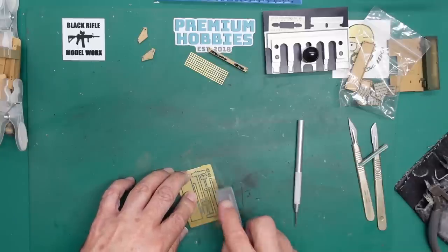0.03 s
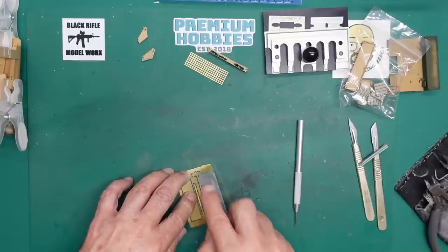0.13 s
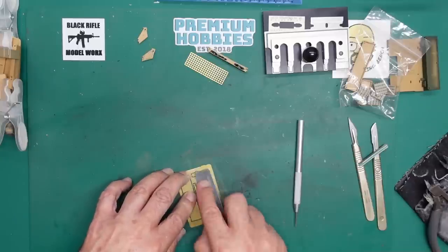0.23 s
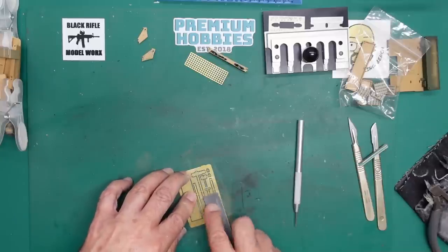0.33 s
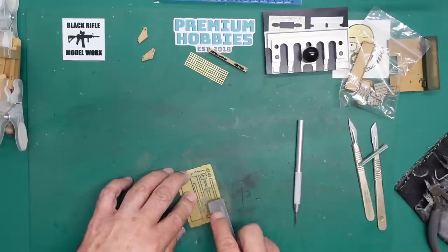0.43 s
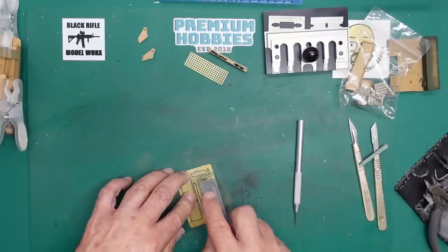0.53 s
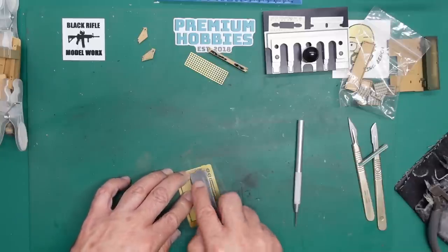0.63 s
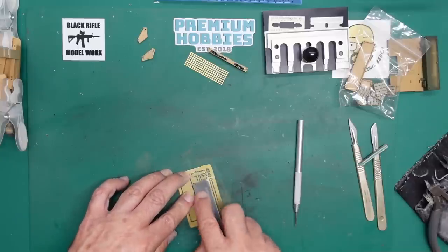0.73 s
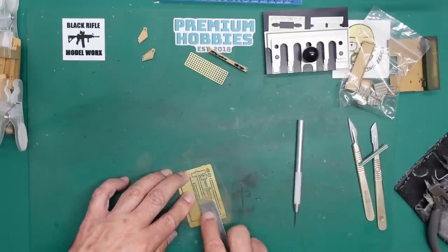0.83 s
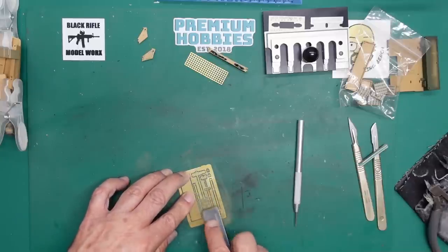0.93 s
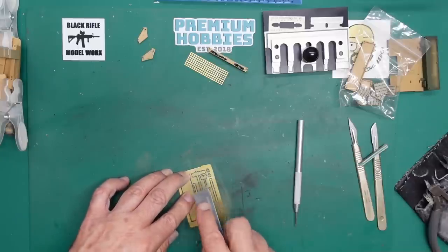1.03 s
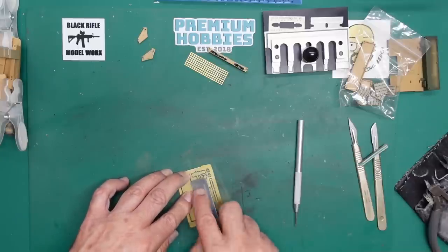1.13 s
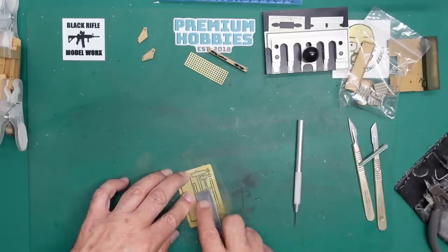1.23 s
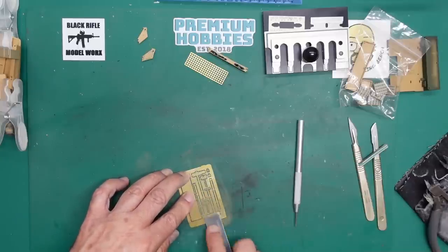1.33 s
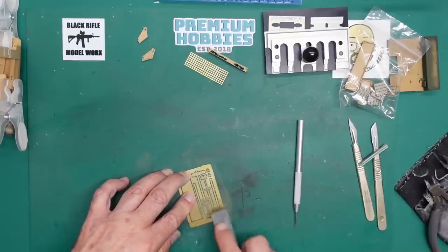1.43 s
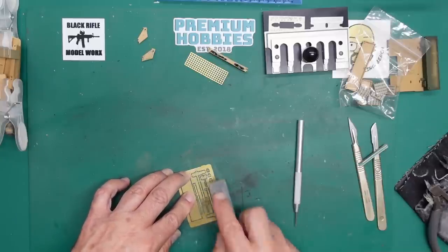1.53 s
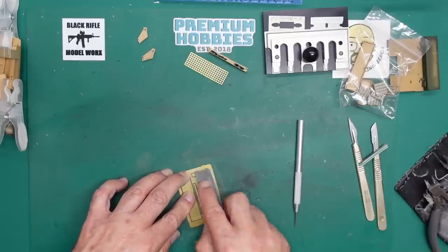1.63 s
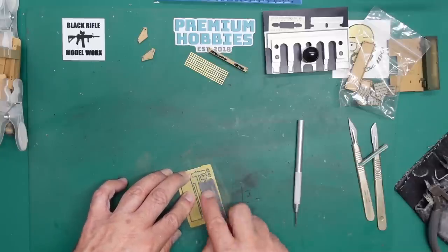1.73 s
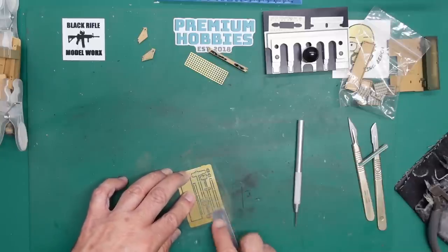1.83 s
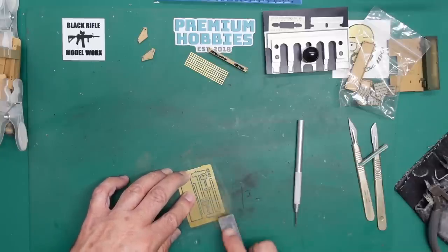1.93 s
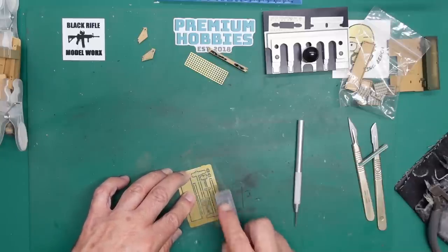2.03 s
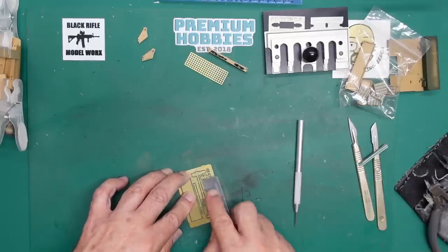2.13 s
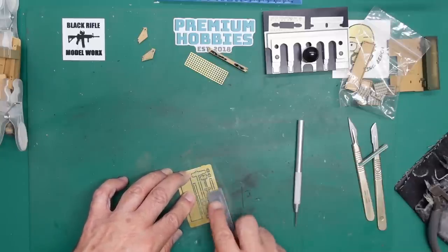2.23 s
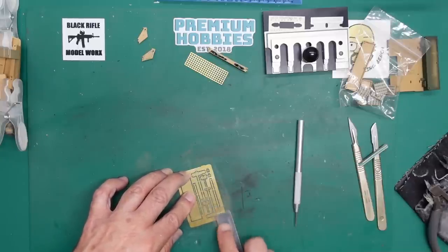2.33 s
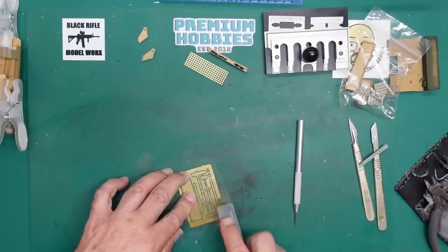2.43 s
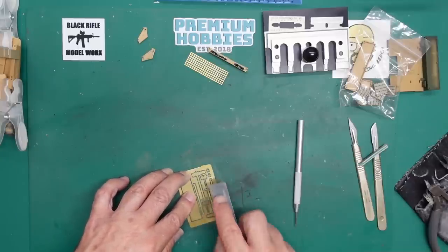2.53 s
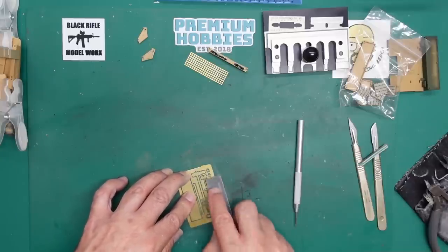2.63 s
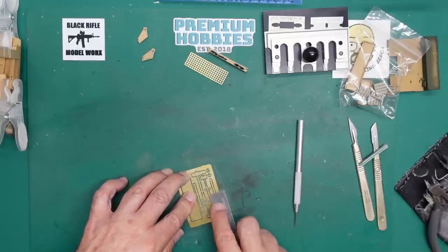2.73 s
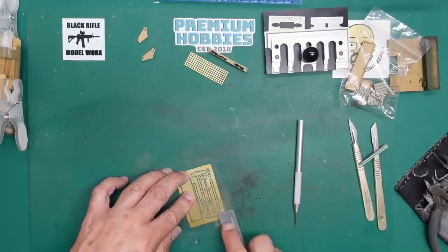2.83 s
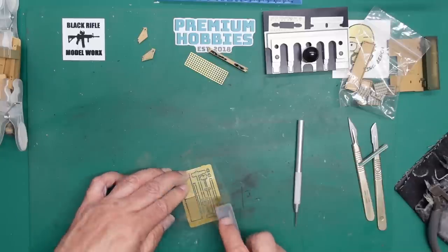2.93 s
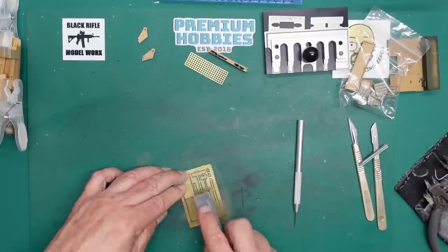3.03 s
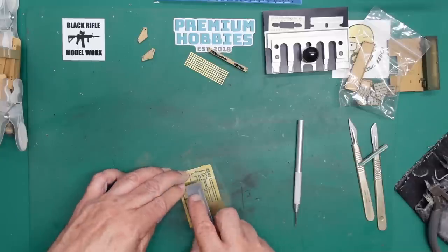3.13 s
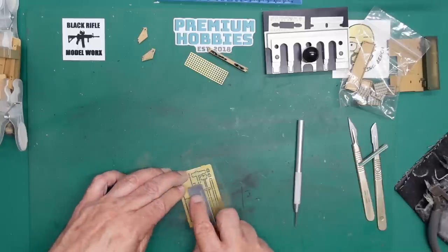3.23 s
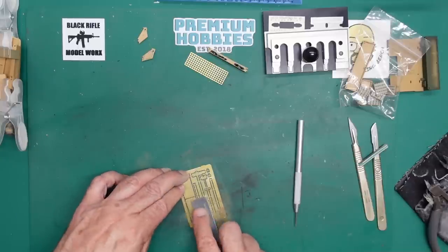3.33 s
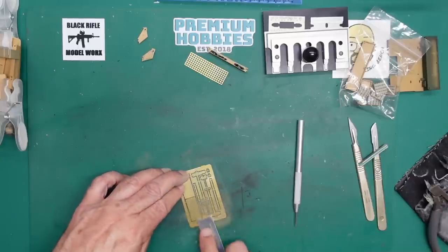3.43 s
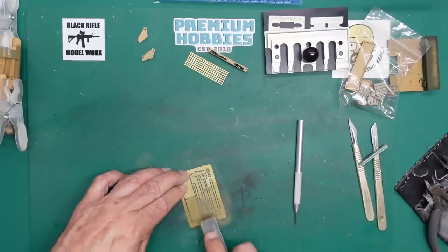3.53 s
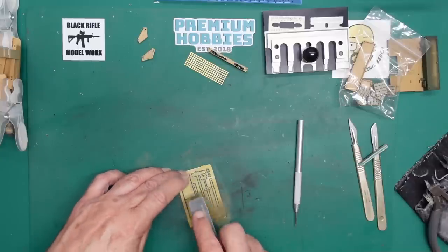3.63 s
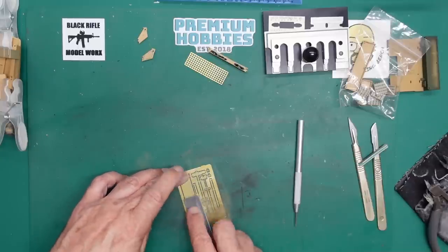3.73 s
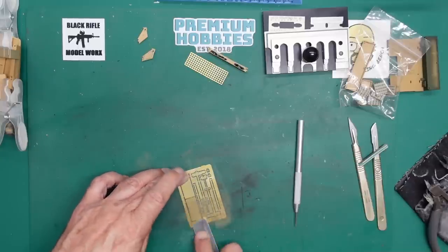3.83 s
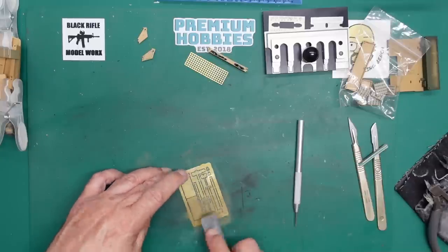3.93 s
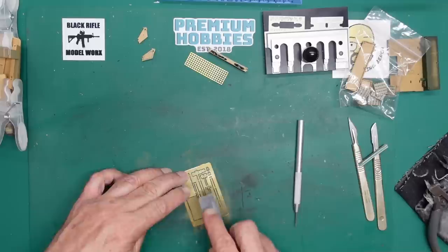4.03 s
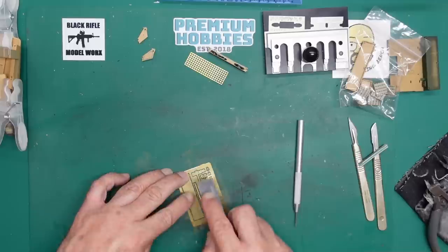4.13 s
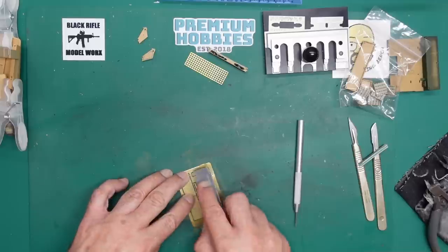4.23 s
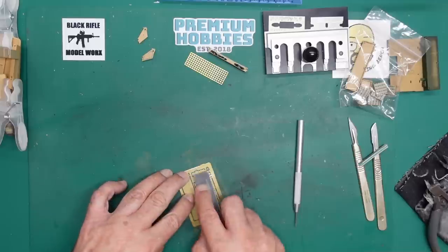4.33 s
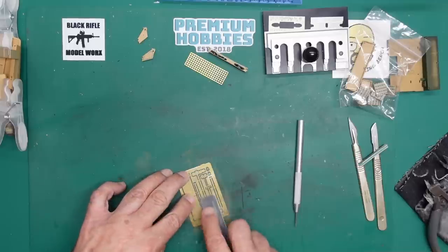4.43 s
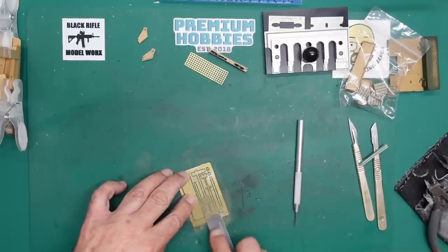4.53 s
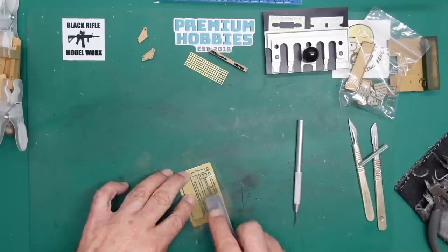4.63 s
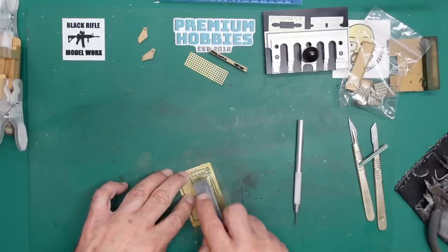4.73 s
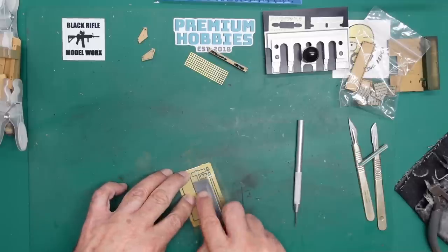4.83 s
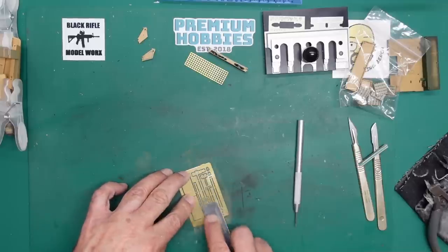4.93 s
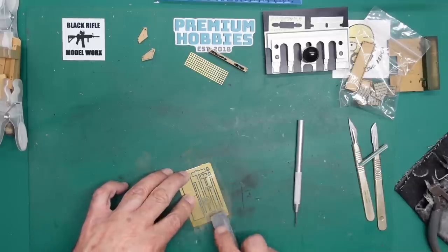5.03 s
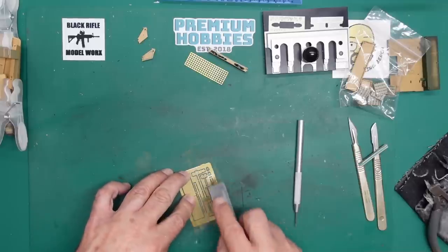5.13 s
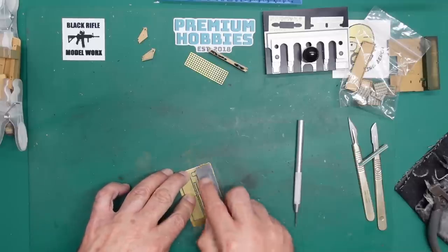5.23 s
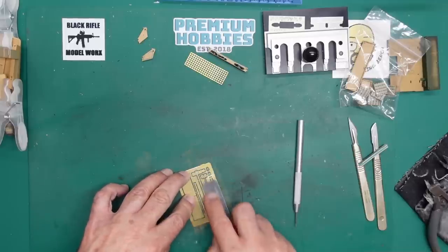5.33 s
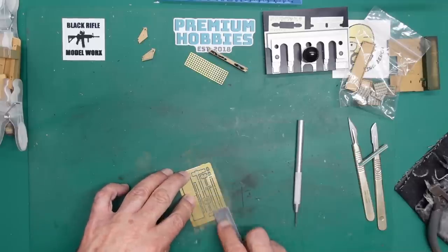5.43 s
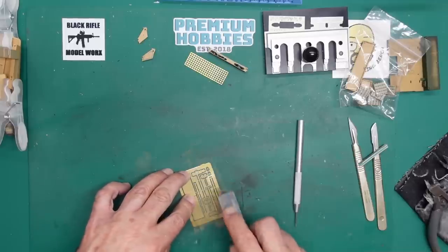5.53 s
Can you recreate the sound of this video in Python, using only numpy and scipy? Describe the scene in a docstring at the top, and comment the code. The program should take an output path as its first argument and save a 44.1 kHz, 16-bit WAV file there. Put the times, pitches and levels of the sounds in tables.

```python
"""Steady room noise with a faint fuzzy hum, and a fainter fuzzy tone that comes and goes, lie under everything.
From 0.2 s a sanding stick is set down on a thin brass sheet on a desk mat: noise-burst ticks excite the
sheet's modes, damped sines knock in the stick, and low pushes with rumble thump the desk.
It then bites, is pushed and lifts: dense random grit impulses drive the same modes as a shaped scratch.
This happens eleven times, up to 5.5 s, in a small damped room heard by a close pair of microphones."""
import sys
import numpy as np
from scipy import signal
from scipy.fft import rfft, irfft
from scipy.io import wavfile
from scipy.ndimage import uniform_filter1d

SR = 44100
rng = np.random.default_rng(int(sys.argv[2]) if len(sys.argv) > 2 else 0)


def digitize_waveform(pressure):
    """Quantize a signal to 16-bit integers and store it at the path in sys.argv[1].

    Rows of a 2-D input are taken as channels; values are limited to [-1, 1].
    """
    field = np.atleast_2d(pressure).T
    bounded = np.clip(field, -1, 1)
    quanta = np.round(bounded * 32767).astype(np.int16)
    wavfile.write(sys.argv[1], SR, quanta)


N = 246959

# colour of grit on brass between the modes, relative: f/Hz, density level/dB
GRIT_COLOUR = [(700, -9), (1200, -10.5), (1650, -5), (2100, -6.5), (2450, -3.5), (2900, -4), (3900, -5.5),
               (5000, -1), (5700, 3.5), (6600, 4.5), (7700, 5), (8700, 3.5), (11000, 2.5), (13500, 2.5),
               (15800, -0.5)]


def gain_of(db):
    """Level: an amplitude ratio is ten to the power of dB over 20."""
    return 10 ** (np.asarray(db) / 20)


def evened(x):
    """Normalisation: scales a signal to a root-mean-square value of 1."""
    return x / np.sqrt(np.mean(x ** 2) + 1e-20)


def read(points, hz):
    """Interpolation: reads a table of values along a logarithmic frequency axis."""
    f, value = np.transpose(points)
    return np.interp(np.log(hz + 1), np.log(f + 1), value)


def add(mix, s, sound):
    """Superposition: adds a sound to the mix from time s."""
    part = mix[round(s * SR):][:len(sound)]
    part += sound[:len(part)]


def resonate(x, hz, width):
    """Resonance: a damped two-pole oscillator with a peak gain near 1."""
    r = np.exp(-np.pi * max(width, 5) / SR)
    return signal.lfilter([1 - r, 0, r - 1], [1, -2 * r * np.cos(2 * np.pi * hz / SR), r * r], x)


def coloured(x, db_of):
    """Linear filtering: weights the spectrum by a level in dB given as a function of frequency."""
    hz = np.fft.rfftfreq(len(x), 1 / SR)
    return irfft(rfft(x) * gain_of(db_of(hz)), len(x))


def wander(rate_hz, count):
    """Slow random variation: straight lines join normal random values drawn rate_hz times a second."""
    knot_t = np.arange(int(N / SR * rate_hz) + 2) / rate_hz
    t = np.arange(N) / SR
    return [np.interp(t, knot_t, row) for row in rng.standard_normal((count, len(knot_t)))]


def air():
    """Partial coherence: steady noise is partly shared by the two channels; resonant noise hums in both."""
    # spectrum of room air and microphone hiss, relative: f/Hz, density level/dB
    air_colour = [(25, -42), (60, -15), (100, -19), (145, -5), (247, -2), (500, -7.5), (900, -11),
                  (1350, -13.5), (1800, -10.5), (2190, -14), (3200, -18), (5640, -20.5), (15800, -26.5)]
    # left-right likeness of the hiss: f/Hz, correlation (0 to 1)
    likeness = [(30, .9), (60, 0.24), (250, 0.49), (1000, 0.7), (4000, 0.6), (15000, 0.83)]
    # fuzzy low hum: f/Hz, width of each of two resonances/Hz, level/dB
    hum_mode = (121, 32, -77)
    level_db = -66

    a, b = rfft(rng.standard_normal((2, N)), axis=1)
    hz = np.fft.rfftfreq(N, 1 / SR)
    same = np.clip(read(likeness, hz), 0, 1)
    pair = np.array([a, same * a + np.sqrt(1 - same ** 2) * b])
    hiss = irfft(pair * gain_of(read(air_colour, hz)), N, axis=1)
    hum_hz, width, hum_db = hum_mode
    hum = resonate(resonate(rng.standard_normal(N), hum_hz, width), hum_hz, width)
    return gain_of(level_db) * evened(hiss) + gain_of(hum_db) * evened(hum)


def whine():
    """Narrow-band noise: two equal resonances in series make a fuzzy tone, unrelated left and right."""
    # spells of the tone: start t/s, end t/s, level/dB
    spells = [(2.42, 2.95, -83), (4.05, 4.12, -86)]
    rest_db, fade_s = -94, 0.15
    tone_hz, width_hz, waver_db = 1870, 90, 3

    t = np.arange(N) / SR
    db = rest_db
    for start, end, top_db in spells:
        inside = np.clip(1 + np.minimum(t - start, end - t) / fade_s, 0, 1)
        db = db + (top_db - rest_db) * inside
    tone = rng.standard_normal((2, N))
    tone = resonate(resonate(tone, tone_hz, width_hz), tone_hz, width_hz)
    return gain_of(db + waver_db * wander(10.1, count=1)[0]) * evened(tone)


def room(x):
    """Reverberation: sparse taps of random sign, unlike left and right, decay at a rate set by frequency."""
    # reverberation time: f/Hz, t60/s
    decay = [(100, 0.94), (2000, 1), (15000, 0.44)]
    taps = np.zeros((2, SR // 2))
    at = np.arange(100, SR // 2 - 20, 20)
    at = at + rng.integers(0, 20, (2, len(at)))  # one tap at random in each slot of 20 samples
    np.put_along_axis(taps, at, rng.choice([-1., 1.], at.shape), 1)
    hz, t, z = signal.stft(taps, SR, nperseg=256)
    fall = gain_of(-60 * t / read(decay, hz)[:, None])
    tail = signal.istft(z * fall, SR, nperseg=256)[1]
    return signal.fftconvolve(x[None], tail / np.linalg.norm(tail[0]), axes=1)[:, :N]


def thumps(rise_s=0.012, rumble_db=-4, sag_db=-14):
    """Forced vibration: the hand's weight gives a low push, rumble and sag, which ring the desk top."""
    # the desk takes the hand's weight: t/s, push level/dB, f of the push/Hz, t60/s
    weights = [(0.242, -54.5, 124, 0.13), (0.698, -58.5, 116, 0.096), (1.184, -60, 120, 0.075),
               (1.683, -59, 152, 0.24), (2.201, -51, 144, .12), (2.671, -57, 133, 0.13),
               (3.213, -50.5, 135, 0.26), (3.734, -50.5, 140.7, 0.24), (3.82, -61, 128, .2),
               (3.97, -61, 111, 0.11), (4.33, -71, 94, 0.11), (4.808, -63, 105, 0.099),
               (5.289, -46.5, 141.4, 0.18)]
    # lowest mode of the desk top: f/Hz, width/Hz, level against the push/dB
    desk_mode = (110, 13, 1.3)

    out, t = np.zeros(N), np.arange(SR // 2) / SR
    rise = 1 - np.exp(-t / rise_s)
    for (s, db, push_hz, t60), noise in zip(weights, rng.standard_normal((len(weights), len(t)))):
        rumble = evened(coloured(noise, lambda f: -20 * np.log10(1 + (f / 300) ** 3 + (90 / (f + 1)) ** 2)))
        push = np.sin(2 * np.pi * push_hz * t)
        sag = gain_of(sag_db) * np.sin(2 * np.pi * 55 * t)
        add(out, s, gain_of(db - 60 * t / t60) * (push + sag + gain_of(rumble_db) * rumble) * rise)
    desk_hz, width, desk_db = desk_mode
    return out + gain_of(desk_db) * resonate(out, desk_hz, width)


def sheet(force, broad_db=-11, bellies=0.37, contact_hz=10):
    """Modal superposition: each mode's drive swells and fades as the contact crosses nodes and bellies."""
    # modes of the sheet: f/Hz, width before contact damping/Hz, level/dB (less the grit colour there)
    sheet_modes = [(1770, 94, -15), (2540, 1100, -15), (3253, 42, -7.5), (3515, 37, -11.5), (3824, 26, -9),
                   (4116, 53, -6.5), (4283, 51, -7.5), (4583, 70, -7), (5296, 70, -0.5), (5600, 110, 1.5),
                   (5880, 17, -7.5), (6083, 12, 2.5), (6880, 100, -4.5), (7320, 120, -2.5),
                   (7810, 280, -1.5), (8480, 51, -5.5), (9020, 74, -3), (9420, 25, -0.5), (9840, 29, 1.5),
                   (10340, 21, -7), (11160, 100, -12.5), (11700, 130, -8), (12220, 110, -4.5),
                   (13200, 130, -0.5), (12700, 100, -10), (13860, 63, -11.5), (13930, 54, -0.5),
                   (15100, 200, -1)]
    damping_hz = 35  # widens every mode
    out = gain_of(broad_db) * force
    for (hz, width, db), place in zip(sheet_modes, wander(contact_hz, count=len(sheet_modes))):
        drive = force * np.cos(np.pi * bellies * place)
        out = out + gain_of(db - read(GRIT_COLOUR, hz)) * resonate(drive, hz, width + damping_hz)
    return out


def ticks(crack_s=0.00045, edge_hz=1200):
    """Impact excitation: a sharp crack and a rattle on the mat drive the sheet; the stick knocks hollowly."""
    # the stick lands, bounces or catches an edge: t/s, drive level of the rattle/dB, centre f/Hz,
    # breadth/octaves, rise t/s, crack re rattle/dB, knock re rattle/dB
    landings = [(0.2255, -56, 3100, 2.1, .0007, 10, 5), (0.486, -53.5, 12250, .7, .002, 0, -12),
                (0.688, -39.5, 9000, 1.4, 0.011, -9, -23), (.699, -46, 5630, 0.57, .0005, 2, 8),
                (.997, -59, 12000, 0.6, .002, 4, -16), (1.1913, -61.5, 8000, 1.6, .0005, 2, -13),
                (1.6837, -57.5, 2860, 5.2, .0006, 0, 7.5), (2.1308, -62, 9000, 1.3, .0006, 19, 4),
                (2.14, -56, 7620, 3.1, 0.00069, 15, 4), (2.157, -53.5, 6580, 3.1, .0012, 11, 6),
                (2.1677, -54, 11900, 0.98, .0012, 12, 7), (2.1863, -54, 12500, 1.2, .002, 0, 10.5),
                (2.6657, -51.5, 2820, 6.4, .0012, 0, 7), (3.088, -68, 13500, 0.41, .002, 0, -16),
                (3.188, -48.5, 5430, 5.6, 0.00029, 14.5, 4), (3.1906, -60, 6200, 1.3, .0003, 6, -6),
                (3.197, -60, 12000, 1.7, .0012, 3, 7), (3.2078, -49.5, 5500, 5.3, 0.0011, 2.2, 2),
                (3.5242, -52, 6310, 1.6, .0017, 0, -9), (3.7252, -52, 7640, 0.97, .0004, 7, -2),
                (3.983, -45.5, 7210, 8.6, 0.0056, 2, 2), (4.3286, -58, 8000, 1.9, .0006, 6, 6),
                (4.7433, -57.5, 3600, 0.37, 0.0019, 2.2, 15.5), (4.812, -58, 6600, 0.6, .0004, -4, 5.5),
                (5.068, -50, 12500, 0.61, .003, 2, -8), (5.286, -41, 6500, 6.1, 0.00028, 14.5, -4),
                (5.288, -55, 6300, 1.2, 0.00029, 12, -12), (5.512, -53, 12000, 0.47, .003, -3, -10)]
    # modes of the stick: f/Hz, level re knock/dB, t60/s
    stick_modes = [(1370, -15.5, 0.04), (1844, -8, 0.027), (2450, -11.5, 0.033), (2680, -13, 0.028)]
    rattle_t60_s, knock_rise_s, grip_db = 0.064, 0.00092, 1.8

    out, knocks, t = np.zeros(N), np.zeros(N), np.arange(4096) / SR
    noises = rng.standard_normal((len(landings), len(t)))
    grips = rng.standard_normal((len(landings), len(stick_modes)))
    for (s, db, hz, octaves, rise_s, crack_db, knock_db), noise, grip in zip(landings, noises, grips):
        noise = evened(coloured(noise, lambda f: -6 * (np.log2((f + 50) / hz) / octaves) ** 2))
        crack = gain_of(crack_db) * np.exp(-t / crack_s)
        rattle = gain_of(-60 * t / rattle_t60_s)
        add(out, s, gain_of(db) * noise * (crack + rattle) * np.minimum(t / rise_s, 1))
        # the grip alters the level of each stick mode a little at every landing
        for (mode_hz, mode_db, ring_s), g in zip(stick_modes, grip):
            ring_db = db + knock_db + mode_db + grip_db * g - 60 * t / ring_s
            ring = gain_of(ring_db) * np.sin(2 * np.pi * mode_hz * t)
            add(knocks, s, ring * np.minimum(t / knock_rise_s, 1))
    # so small a sheet radiates no bass
    thin = signal.sosfilt(signal.butter(3, edge_hz, "high", fs=SR, output="sos"), out)
    return sheet(thin, broad_db=1) + knocks


def contact(t):
    """Energy addition: strokes that bite, speed up, hold, lift and die, and brushes, sum as band powers."""
    # one row a stroke: bite t/s, up to speed t/s, lift t/s, release length t/s, then nominal values:
    # bite level/dB, up-to-speed level/dB, mid-stroke swell/dB, lift level/dB, body (low band) relative/dB,
    # fizz (high band) relative/dB, drift of body from bite to lift/dB, drift of fizz/dB
    strokes = [(.264, 0.376, .44, 0.066, -58.5, -49.5, 1.5, -47.5, -3.5, 1, -5, -6),
               (0.737, 0.788, .94, 0.049, -56, -51, 2, -47.5, -5, 1, 2.5, -1),
               (1.237, 1.313, 1.409, 0.06, -61.5, -48.5, 1.5, -46.5, -6, 1.5, 0.5, 0),
               (1.723, 1.801, 1.939, 0.047, -61.5, -47.5, 2.2, -49.5, -3.5, 1, 1.5, 2.5),
               (2.214, 2.268, 2.398, 0.043, -61, -51, 0.5, -48.5, -3, 4.5, 0.5, 2.5),
               (2.703, 2.755, 2.844, 0.077, -62, -48.5, 0, -50.5, -4, 3.5, 1, 1.5),
               (3.259, 3.43, 3.488, 0.048, -66, -45, -1, -43, -4, 0.5, -4, -2),
               (3.779, 3.887, 3.934, 0.048, -59.5, -44, .5, -45, -6.5, 0, -1.5, -8),
               (4.379, 4.431, 4.585, 0.044, -59.5, -49, 0, -44.5, -2.5, 2, -3, 2.5),
               (4.868, 4.96, 5.035, .045, -56.5, -46.5, 3.5, -49.5, -4, 1, -2, -1),
               (5.308, 5.372, 5.5, 0.045, -58, -47, 0.4, -50, -3, 2, -2, 4)]
    # lean of body and of fizz in any stroke, level/dB at:
    # approach, bite, speed-up, full speed, mid-stroke, lift, release, tail
    body_lean = (6, -0.4, 0.6, -0.1, 0.83, -3.5, 4, 8)
    fizz_lean = (3, -1, 1, 0.4, 1.3, -2, 5, -9)
    # the stick brushes the sheet lightly while set or turned: t/s, level/dB, half length t/s
    brushes = [(0.722, -59.5, 0.025), (2.18, -56.5, 0.047), (2.52, -77, .06), (3.206, -59, 0.044),
               (3.24, -69, .03), (3.639, -66, 0.054), (3.75, -67, .03), (3.982, -52, 0.036),
               (5.3, -57, .015)]
    approach_s, approach_db = 0.015, -17  # before the bite, against its level
    ease_db = 1.5  # the speed-up bows upward
    release_db, tail_s, tail_db = -25, 0.074, -37.5  # after the lift, against its level
    brush_ends_db, brush_body_db, brush_fizz_db = -17, -5.5, 1.5

    power = np.full((3, len(t)), 1e-12)  # rows: body, middle, fizz
    for (bite, up, lift, release_s, bite_db, up_db, swell_db, lift_db,
         body_db, fizz_db, body_drift_db, fizz_drift_db) in strokes:
        release = lift + release_s
        s = np.array([bite - approach_s, bite, (bite + up) / 2, up,
                      (up + lift) / 2, lift, release, release + tail_s])
        db = np.array([bite_db + approach_db, bite_db, (bite_db + up_db) / 2 + ease_db, up_db,
                       (up_db + lift_db) / 2 + swell_db, lift_db, lift_db + release_db, lift_db + tail_db])
        along = np.clip((s - bite) / (lift - bite), 0, 1) - .5
        body = body_db + body_drift_db * along + body_lean
        fizz = fizz_db + fizz_drift_db * along + fizz_lean
        during = (t >= s[0]) * (t <= s[-1])
        power += [gain_of(2 * np.interp(t, s, db + lean)) * during for lean in (body, 0, fizz)]
    brush_colour = np.array([[brush_body_db], [0], [brush_fizz_db]])
    for s, db, half_s in brushes:
        far = abs(t - s) / half_s
        power += gain_of(2 * (db + brush_ends_db * far + brush_colour)) * (far < 2)
    return 10 * np.log10(power)


def scratch(grains_per_s=25000, spread_db=-0.2, patchy_db=2.0):
    """Stochastic excitation: grit grains catch and release; pressure and speed shift weight among bands."""
    knee_hz, knee_db = 3050, -6  # below this the pressed sheet radiates abruptly less
    size = gain_of(spread_db * np.minimum(rng.exponential(1, N), 5)) * rng.standard_normal(N)
    grit = size * (rng.random(N) < grains_per_s / SR)
    ringing = sheet(coloured(grit, lambda f: read(GRIT_COLOUR, f)))
    hz, t, z = signal.stft(ringing, SR, nperseg=256, noverlap=192)
    zones = [(hz < 5000), (hz >= 5000) & (hz < 10000), (hz >= 10000)]  # body, middle, fizz
    for zone in zones:
        # unit mean power in each zone; 1.5 allows for the window's noise bandwidth
        z[zone] /= np.sqrt(2 * np.mean(np.sum(abs(z[zone]) ** 2, axis=0)) / 1.5)
    level_db = sum(zone[:, None] * db for zone, db in zip(zones, contact(t)))
    level_db = uniform_filter1d(level_db, size=5, axis=0)  # blends the zone borders
    level_db = level_db + knee_db * (hz < knee_hz)[:, None]
    # worn and fresh patches of abrasive favour different bands for a moment
    patches = rng.standard_normal(z.shape[::-1]).T
    patches = uniform_filter1d(patches, size=4, axis=0)
    patches = evened(uniform_filter1d(patches, size=40, axis=1))
    return signal.istft(z * gain_of(level_db + patchy_db * patches), SR, nperseg=256, noverlap=192)[1][:N]


def apart(x):
    """Decorrelation: random phases make a side signal that grows with frequency, widening the treble."""
    # side signal against middle: f/Hz, level/dB
    side_level = [(2000, -93), (5000, -34), (9000, -12), (15000, -8.5)]
    hz, t, z = signal.stft(x, SR, nperseg=128)
    turn = np.exp(2j * np.pi * rng.random(z.shape[::-1]).T)  # random phases
    return signal.istft(z * turn * gain_of(read(side_level, hz))[:, None], SR, nperseg=128)[1][:N]


def scene():
    """Middle-and-side superposition: the work lies centred, in a small damped room."""
    brass = scratch() + ticks()
    no_bass = signal.butter(4, 500, "high", fs=SR, output="sos")
    work = signal.sosfilt(no_bass, brass) + thumps()
    side = signal.sosfilt(no_bass, apart(brass))
    direct = work + side * np.array([[1], [-1]])
    return direct + gain_of(-19) * room(work) + air() + whine()


def record(dry):
    """Band limitation: a symmetric low-pass ends the spectrum near 15.8 kHz."""
    edge_hz = 15780
    low_pass = signal.firwin(1023, edge_hz, window=("kaiser", 9), fs=SR)
    return signal.oaconvolve(dry, low_pass[None], "same")


dry = scene()
out = record(dry)
digitize_waveform(out)
```